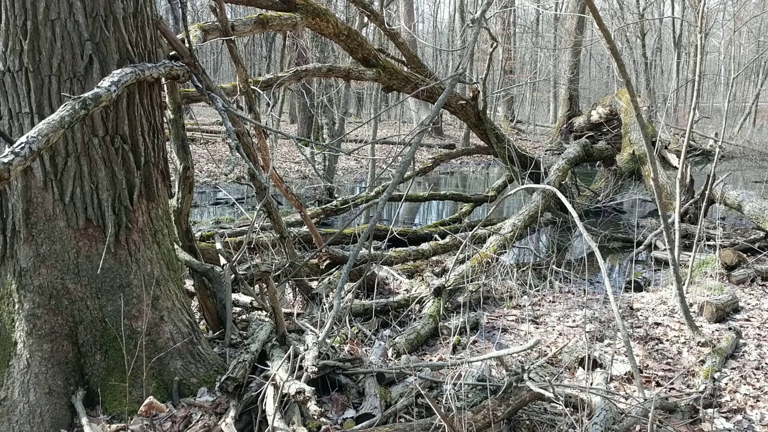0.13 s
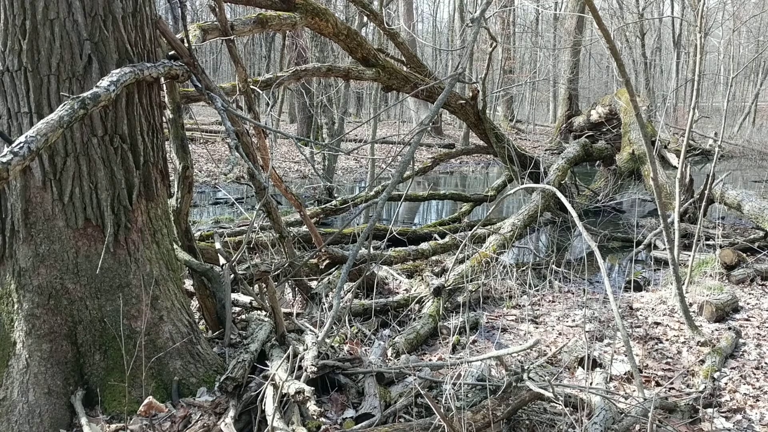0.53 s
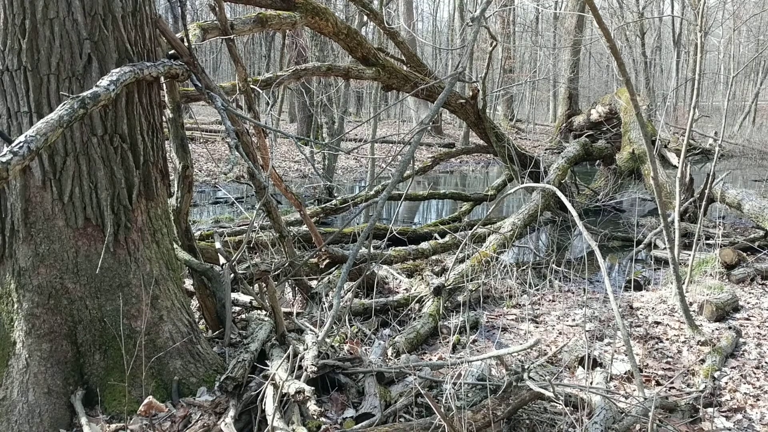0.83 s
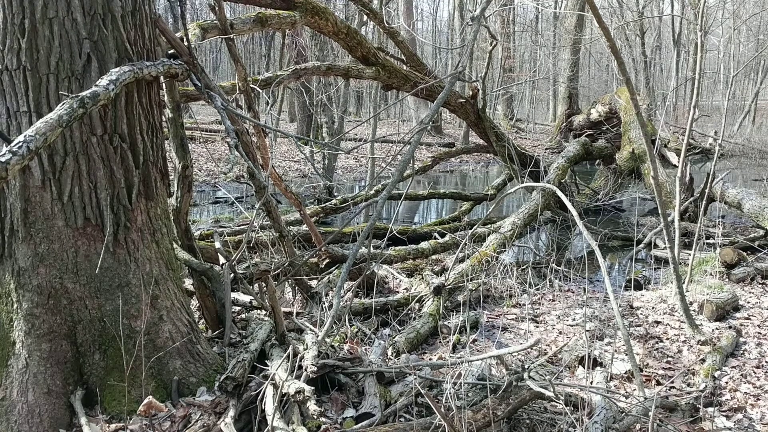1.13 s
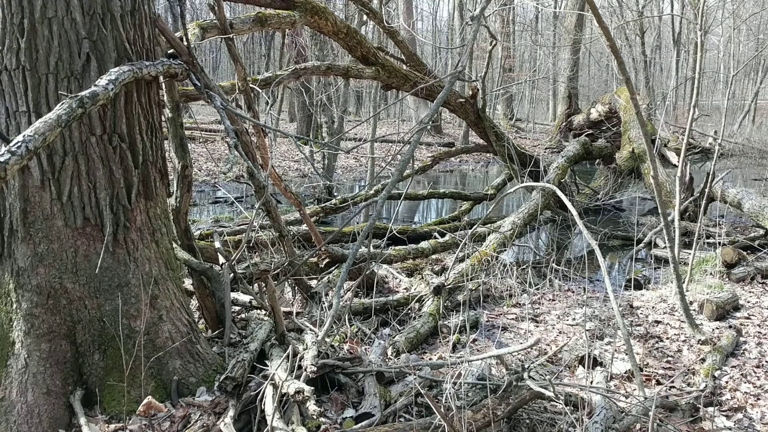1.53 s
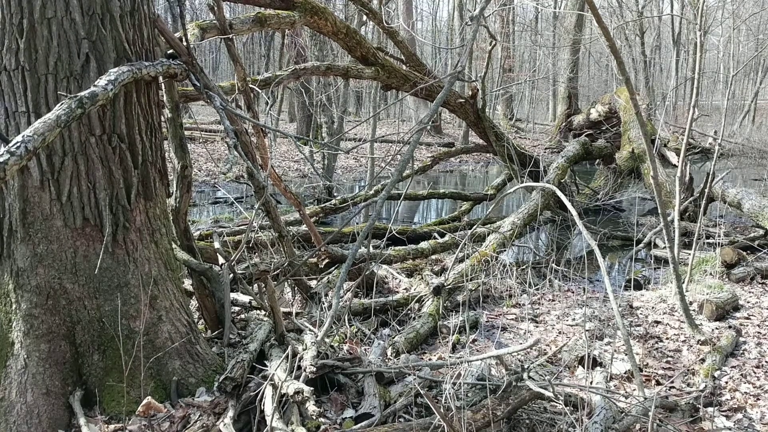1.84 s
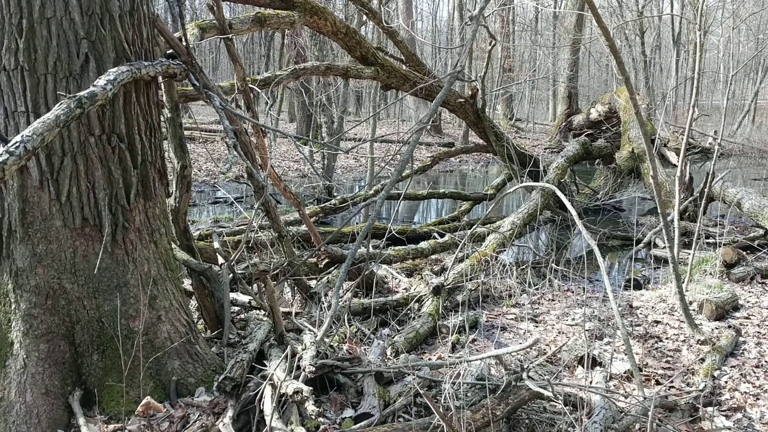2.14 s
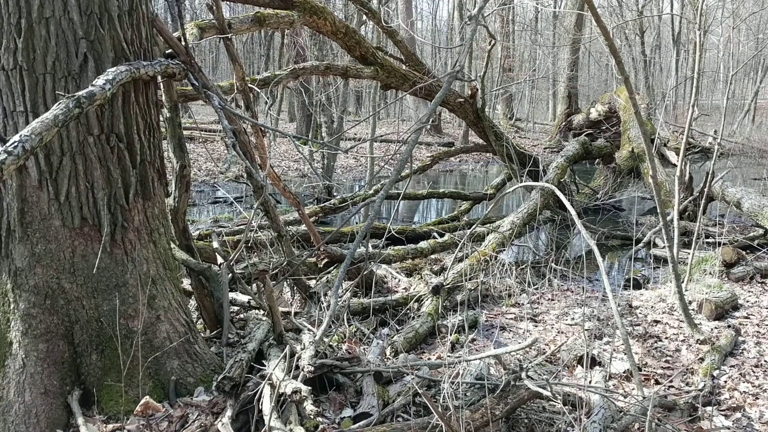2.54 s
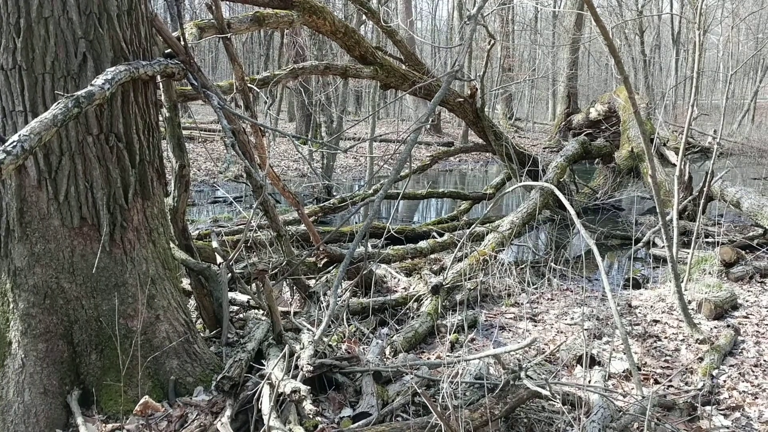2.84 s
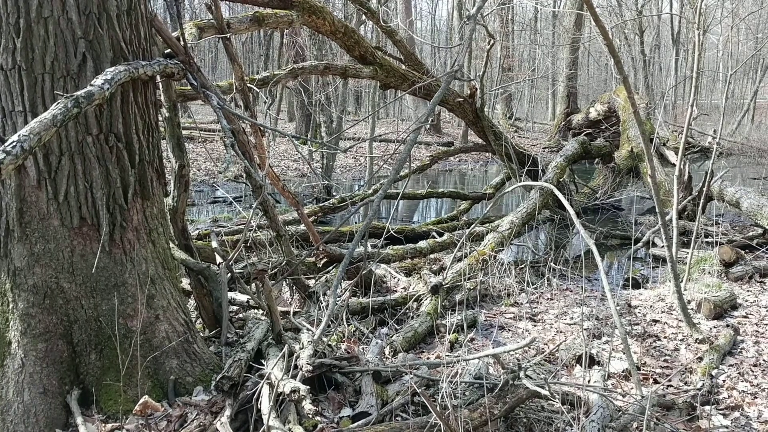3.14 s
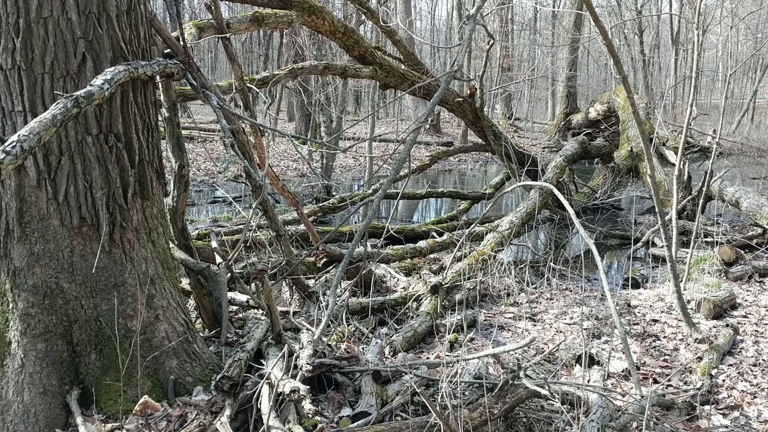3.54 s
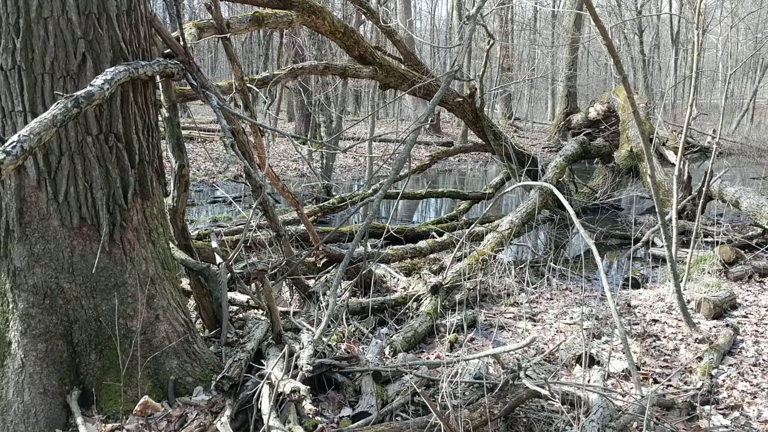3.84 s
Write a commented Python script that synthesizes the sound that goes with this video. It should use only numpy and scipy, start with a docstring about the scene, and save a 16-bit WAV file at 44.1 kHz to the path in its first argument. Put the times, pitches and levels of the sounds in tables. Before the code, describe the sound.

Many frogs give short, raspy, overlapping quacks near the microphone, with weaker ones far off, in an echoing woodland pond. Light wind rumbles, buffeting the microphone more in the second half; a few leaf ticks.

```python
"""Frogs quack near the microphone in a woodland pond. Each quack is a short train of pulses that speeds up
and slows again while it rings the vocal sacs, body and throat; trunks and water scatter it.
More frogs call weakly far off. Light wind, as filtered noise, rumbles and buffets the microphone;
dry leaves tick as short bright noise bursts over a smooth hiss. The sound fades in at the start."""
import sys
import numpy as np
from scipy import signal
from scipy.fft import rfft, irfft
from scipy.io import wavfile
from scipy.ndimage import uniform_filter1d

SR = 44100
rng = np.random.default_rng(int(sys.argv[2]) if len(sys.argv) > 2 else 0)


def master_out(mix):
    """Clip the mix to full scale and print it as 16-bit PCM to the path in sys.argv[1]."""
    frames = np.transpose(np.atleast_2d(mix))
    ceiling = np.clip(frames, -1, 1)
    pcm = np.round(ceiling * 32767).astype(np.int16)
    wavfile.write(sys.argv[1], SR, pcm)


N = 176400
SIZE = 8192  # samples in a quack or tick
RUMBLE_LOW_HZ = 48.3  # lower edge of wind and air


def undb(db):
    """Decibels to gain."""
    return 10 ** (np.asarray(db) / 20)


def level(x, db):
    """Scale to an rms level."""
    return x * undb(db) / np.sqrt(np.mean(x ** 2))


def burst(x, length_s, db):
    """Scale a short sound so its energy spread over length_s has this rms level."""
    return x * undb(db) * np.sqrt(length_s * SR / (np.sum(x ** 2) + 1e-18))


def add(out, start_s, x):
    """Mix x into out at a time, cropped to the scene."""
    i = int(start_s * SR)
    a, b = max(i, 0), min(i + len(x), N)
    if b > a:
        out[a:b] += x[a - i:b - i]


def freqs(size):
    """Frequencies of a spectrum's bins in Hz, kept above zero."""
    return np.maximum(np.arange(size // 2 + 1) * SR / size, 1e-3)


def ring(f, hz, width_hz):
    """Response of one resonance, gain 1 at its centre."""
    return 1 / (1 + 1j * (f * f - hz * hz) / (f * width_hz))


def noise(gain):
    """White noise shaped by a gain per frequency bin."""
    white = rng.standard_normal(2 * (len(gain) - 1))
    return irfft(rfft(white) * gain)


def interpolated(points):
    """Gain over the scene from (s, dB) points."""
    return undb(np.interp(np.arange(N) / SR, *np.array(points).T))


def pulse_train(length_s, rate_hz, rough, count=64):
    """Pulse times, places (-1 to 1) and strengths: the train swells, quickens and slows."""
    first_pulse_cycles, jitter_cycles, shimmer_db = 0.388, 0.2125, 4.5  # scatters at full roughness
    rate_sag = 0.11  # approximate share by which the pulse rate drops at the ends
    swell_power, swell_skew = 0.4, 0.73  # fullness; skew under 1 puts the peak early
    slip, strength = rng.standard_normal((2, count))
    cycles = np.arange(count) + first_pulse_cycles + jitter_cycles * rough * slip
    steady_s = cycles / rate_hz - length_s / 2
    when_s = steady_s * (1 + rate_sag * ((2 * steady_s / length_s) ** 2 - 1) / np.pi)
    live = np.abs(when_s) < length_s / 2
    place = 2 * when_s[live] / length_s
    swell = np.sin(np.pi * ((place + 1) / 2) ** swell_skew) ** swell_power
    return when_s[live] + length_s / 2, place, swell * undb(shimmer_db * rough * strength[live])


def body_response(f):
    """Lower resonances of the body, each with a broader skirt."""
    # Each row: centre in Hz, width in Hz, level in dB
    body_modes = [(659, 154, -8), (1166, 53, -7.5)]
    return sum(undb(db) * ring(f, hz, width) * ring(f, hz, hz / 2) for hz, width, db in body_modes)


def throat_response(f, sac_hz):
    """Upper throat resonances partly follow the sac pitch; a broad rasp adds each pulse's click."""
    # Each row: multiple of the base pitch, width in Hz, level in dB
    throat_modes = [(1.399, 280, -22), (1.78, 219, -22.5), (2.97, 260, -29.5)]
    follow, skirt_hz, typical_sac_hz = 0.67, 850, 1370
    rasp_db, rasp_hz = -46, 3330
    base_hz = typical_sac_hz * (sac_hz / typical_sac_hz) ** follow
    throat = undb(rasp_db) * ring(f, rasp_hz, rasp_hz) ** 4
    for multiple, width_hz, db in throat_modes:
        hz = multiple * base_hz
        throat = throat + undb(db) * ring(f, hz, width_hz) * ring(f, hz, skirt_hz) ** 2
    return throat


def quack(length_s, db, rate_hz, sac_hz, rough, bright_db):
    """Each pulse rings the sacs, whose pitch arches with the effort, plus the body and throat."""
    sac_sag = 0.1  # share by which the sac resonance drops at the ends
    sac_width_hz, sac_skirt_hz, voice_top_hz = 273, 1110, 4760
    t, f = np.arange(SIZE // 16) / SR, freqs(SIZE)
    pulses, sac = np.zeros(SIZE), np.zeros(SIZE)
    for time_s, place, push in zip(*pulse_train(length_s, rate_hz, rough)):
        i = time_s * SR
        k = int(i)
        pulses[k:k + 2] += push * np.array([1 - i + k, i - k])  # between-sample timing
        age_s = t + (k + 1 - i) / SR
        pitch_hz = sac_hz * (1 - sac_sag * place * place)
        decay = np.exp(-np.pi * sac_width_hz * age_s)
        sac[k + 1:k + 1 + len(age_s)] += push * decay * np.cos(2 * np.pi * pitch_hz * age_s)
    sac_spectrum = rfft(sac) * 2 * np.pi * sac_width_hz / SR * ring(f, sac_hz, sac_skirt_hz) ** 2
    upper = undb(bright_db) * throat_response(f, sac_hz)
    voice = irfft(sac_spectrum + rfft(pulses) * (body_response(f) + upper))
    lowpass = signal.butter(6, voice_top_hz, fs=SR, output="sos")
    return burst(signal.sosfilt(lowpass, voice), length_s, db)


def near_frogs():
    """Each near quack has its own scatter from trunks and water, stronger for the rough ones."""
    # Each row: middle in seconds, nominal length in seconds, level in dB, nominal pulse rate in Hz,
    # sac resonance in Hz, roughness 0-1, brightness in dB
    quacks = [ (0.18, .04, -51.5, 283, 1740, 0.67, 4), (0.223, 0.042, -49, 289.7, 1770, 0.8, 4.5),
              (0.274, .025, -60, 325, 2310, .3, -9), (0.245, 0.039, -44, 454.7, 1376, 0.31, 4),
              (0.323, 0.052, -47.5, 358.6, 1330, .3, 8.5), (0.355, 0.029, -38, 357.7, 1470, 0.28, 6),
              (0.381, 0.024, -39, 375.2, 1510, 0.13, -23), (0.429, 0.044, -50, 221, 1540, 0.47, 3),
              (.488, 0.025, -49, 359.7, 1390, 0.13, -7), (.517, 0.033, -47, 317.7, 1210, 0.39, -8),
              (0.578, .06, -46, 370.4, 1420, 0.42, -2), (0.634, 0.064, -46.5, 383, 1363, 0.4, 2),
              (0.755, 0.045, -46.5, 217.4, 1180, 0.32, 4), (.836, 0.043, -47.5, 302, 1530, 0.57, -5),
              (0.88, 0.051, -48, 180, 1170, 0.68, -3), (0.95, 0.049, -49, 195, 1430, 0.54, 0),
              (0.98, 0.039, -44.5, 276.7, 1330, 0.75, 0), (1.015, 0.039, -49, 251, 1380, 0.41, -6),
              (1.071, 0.036, -47.5, 311, 1300, 0.65, -10), (1.093, 0.048, -49, 315, 1320, 0.62, -5),
              (1.147, 0.044, -43, 229.4, 1360, 0.44, 1), (1.197, 0.08, -47, 169, 1410, 0.57, 0),
              (1.383, 0.021, -47.5, 218, 1370, 0.32, -15), (1.446, 0.043, -49, 230, 1470, 0.61, 7),
              (1.461, 0.032, -42.5, 428, 1370, 0.08, 6), (1.494, 0.0087, -41.5, 402, 1770, 0.21, 2),
              (1.505, 0.024, -41, 209.3, 1555, 0.2, 3.5), (1.599, 0.036, -47, 288, 1070, 0.42, -12),
              (1.614, 0.039, -55, 333, 2150, 0.42, 4), (1.645, 0.045, -43.5, 314.6, 1340, 0.54, 3.5),
              (1.724, 0.033, -44, 346.4, 1300, 0.37, -0.5), (1.766, 0.055, -45.5, 288.4, 1410, 0.63, -5),
              (1.817, 0.043, -46, 346, 1420, .2, -2), (1.881, 0.045, -51, 333, 1440, 0.06, 2),
              (1.914, 0.054, -48, 296.6, 1320, 0.48, -7), (1.978, 0.016, -42, 321, 1480, 0.54, -3),
              (2.006, 0.038, -46.5, 204.2, 1320, 0.5, -1), (2.075, 0.04, -54, 213.6, 1350, 0.38, -13),
              (2.142, 0.043, -49.5, 239.5, 1290, 0.56, 1), (2.177, 0.045, -44, 294, 1290, 0.51, 0),
              (2.217, 0.05, -45, 332.2, 1385, 0.25, 2), (2.281, 0.045, -43, 318.6, 1370, 0.58, 1.5),
              (2.329, 0.031, -37.5, 432, 1690, 0.34, -15), (2.392, 0.078, -45.5, 239, 1290, 0.44, -20),
              (2.428, 0.023, -42, 392, 1570, 0.16, -5), (2.458, 0.035, -46, 380.6, 1445, 0.38, 4.5),
              (2.46, 0.048, -51, 387, 1970, 0.37, -12), (2.497, 0.053, -49.5, 216.2, 1310, 0.68, -2),
              (2.6, 0.028, -40.5, 292.5, 1347, 0.48, -4.5), (2.684, 0.039, -43, 298.6, 1585, 0.58, 6.5),
              (2.717, 0.04, -39.5, 354, 1335, 0, 2.5), (2.747, 0.027, -47, 311.6, 1540, 0.28, -4),
              (2.842, 0.055, -53.5, 317.6, 1195, 0.13, 4), (2.909, 0.041, -52.5, 273.5, 1350, 0.47, -7),
              (2.954, 0.032, -54, 271.7, 1830, 0.33, -6), (2.994, 0.037, -47, 325.6, 1430, 0.31, -13),
              (3.052, 0.058, -48, 276.7, 1410, 0.46, 0), (3.12, 0.063, -46, 348.5, 1480, 0.47, 3),
              (3.145, 0.054, -42, 352.6, 1355, 0.24, -7), (3.207, .02, -43, 328, 1430, .3, 1),
              (3.234, 0.072, -48.5, 107.2, 1430, 0.38, -6), (3.288, .036, -46.5, 339, 1400, 0.43, 5.5),
              (3.313, .024, -37.5, 368.4, 1500, .2, -7), (3.358, 0.061, -43, 230, 1440, 0.65, -3.5),
              (3.384, 0.02, -45.5, 278, 1410, 0.6, 0.5), (3.436, 0.048, -47.5, 249.2, 1460, 0.64, -8),
              (3.538, 0.036, -44, 329.4, 1580, 0.5, -10), (3.561, 0.04, -48.5, 307, 1300, 0.2, -6),
              (3.614, 0.039, -49.5, 198.8, 1440, 0.51, 5.5), (3.706, 0.036, -46, 243, 1330, 0.39, -5),
              (3.756, .03, -52, 279, 1340, 0, 0), (3.788, .022, -46.5, 278, 1310, 0.54, 5.5),
              (3.811, 0.025, -39, 338, 1425, 0.31, -3), (3.841, .03, -41, 264, 1410, 0.44, -3),
              (3.862, 0.022, -38.5, 355.7, 1440, 0.35, -0.5), (3.915, 0.033, -39.5, 167.2, 1460, 0.18, 2.5),
              (3.951, .044, -41, 112.1, 1280, 0.26, -20), (3.991, 0.043, -47.5, 289.5, 1770, 0.61, 7)]
    scatter_t60_s, scatter_db = 0.046, 5.5  # gain at full roughness
    out = np.zeros(N)
    for middle_s, length_s, db, rate_hz, sac_hz, rough, bright_db in quacks:
        length_s, rough = np.clip(length_s, .01, .12), np.clip(rough, 0, 1)
        call = quack(length_s, db, rate_hz, sac_hz, rough, bright_db)
        scatter = rng.standard_normal(SIZE) * undb(-60 * np.arange(SIZE) / SR / scatter_t60_s)
        scatter = scatter / np.linalg.norm(scatter)
        call = call + rough * undb(scatter_db) * signal.fftconvolve(call, scatter)[:SIZE]
        add(out, middle_s - length_s / 2, burst(call, length_s, db))
    return out


def far_frogs():
    """Weak, dull quacks with random pitch and level, jittered about even spacing."""
    count, mean_db, spread_db, bright_db = 160, -59, 4.5, -22
    out = np.zeros(N)
    for k, (when, loud, pitch, sac) in enumerate(rng.standard_normal((count, 4))):
        rate_hz, sac_hz = 310 * np.exp(.18 * pitch), 1350 * np.exp(0.075 * sac)
        call = quack(.05, mean_db + spread_db * loud, rate_hz, sac_hz, .5, bright_db)
        add(out, (k + when / 2) / count * N / SR, call)
    return out


def woods_echoes(frogs):
    """Trunks and water return a decaying cloud of reflections, duller than the calls."""
    t60_s, gain_db, top_hz = 0.76, -11.5, 3630
    t = np.arange(SR) / SR
    cloud = noise(1 / np.hypot(1, freqs(SR) / top_hz))
    tail = level(cloud, 0) * undb(-60 * t / t60_s) * (1 - np.exp(-t / .003))
    band = np.abs(rfft(tail))[700:2200]  # bins are 1 Hz apart
    tail = tail / np.sqrt(np.mean(band ** 2))  # unit rms gain in the voice band
    return undb(gain_db) * signal.fftconvolve(frogs, tail)[:N]


def turbulence(size, top_hz, slope):
    """Low pressure noise of air tumbling over the microphone."""
    f = freqs(size)
    return noise(1 / np.hypot(1, (RUMBLE_LOW_HZ / f) ** 7) / np.hypot(1, (f / top_hz) ** slope))


def wind():
    """A soft rumble with short buffets, each one smooth swell of turbulence."""
    # Each row: time in seconds, rumble level in dB
    rumble_levels = [(0, -71), (.4, -58.5), (.6, -52.5), (1.3, -51.5), (2.1, -50.5), (2.8, -47),
                     (3.4, -47.5), (3.6, -51), (4, -52.5)]
    # Each row: middle in seconds, length in seconds, level in dB, upper edge in Hz
    buffets = [(0.558, 0.059, -48.5, 60), (.8, 0.31, -55, 89), (1.048, 0.036, -47, 65),
               (1.441, 0.078, -40, 103), (1.59, 0.093, -45.5, 88), (2.238, 0.097, -45.5, 89),
               (2.362, 0.084, -56, 72), (2.471, 0.033, -35.5, 110), (2.606, 0.021, -36.5, 71),
               (2.657, 0.048, -31.5, 117.4), (2.833, 0.028, -37, 64.8), (2.867, 0.0073, -26.5, 247),
               (2.876, 0.033, -27, 106), (3.026, 0.044, -29.5, 92.4), (3.173, 0.073, -30.5, 60),
               (3.212, 0.1, -41, 100), (3.274, 0.021, -35, 80), (3.334, 0.037, -27, 106),
               (3.375, 0.07, -37, 58.5)]
    rumble_top_hz, rumble_slope = 80.5, 2.725
    buffet_slope, steady_s = 3.32, 0.021
    out = level(turbulence(N, rumble_top_hz, rumble_slope), 0) * interpolated(rumble_levels)
    t = (np.arange(SIZE * 2) - SIZE) / SR
    for middle_s, length_s, db, top_hz in buffets:
        eddy = turbulence(SIZE * 2, top_hz, buffet_slope)
        power = np.abs(signal.hilbert(eddy)) ** 2
        eddy = eddy / np.sqrt(uniform_filter1d(power, int(steady_s * SR)))  # even out its level
        swell = np.exp(-np.abs(2 * t / length_s) ** 1.4)
        add(out, middle_s + t[0], burst(eddy * swell, length_s, db))
    return out


def leaves():
    """Tiny bright ticks of dry leaves: resonant noise with a fast rise and decay."""
    # Each row: start in seconds, level in dB, centre in Hz
    ticks = [(1.565, -77, 11800), (1.716, -72, 11800), (2.486, -69, 14100), (2.5, -74, 14000),
             (2.822, -69, 12800), (2.833, -65.5, 11900), (3.08, -75, 12000)]
    decay_s, rise_s, width_hz = 0.0036, 0.0027, 3800
    out, t = np.zeros(N), np.arange(SIZE) / SR
    shape = np.exp(-t / decay_s) * (1 - np.exp(-t / rise_s))
    for start_s, db, hz in ticks:
        tick = noise(ring(freqs(SIZE), hz, width_hz)) * shape
        add(out, start_s, burst(tick, decay_s, db))
    return out


def air():
    """Smooth distant hiss of the woods: shaped noise, swelling gently."""
    # Each row: frequency in Hz, relative spectral density in dB
    spectrum = [(100, -1), (300, 6.5), (480, -4.5), (700, -1), (1500, -5), (3000, -19.5), (5000, -23.5),
                (7000, -26.5), (9000, -33), (15500, -36)]
    # Each row: time in seconds, gain in dB
    swell_points = [(0, -11.5), (.4, 2), (1.0, .5), (1.6, -0.5), (2.2, 2), (2.6, 0), (3.4, 0.5), (4, 1.5)]
    db_before_swell = -57
    f = freqs(N)
    hz, db = np.array(spectrum).T
    gain = undb(np.interp(np.log(f), np.log(hz), db)) / np.hypot(1, (RUMBLE_LOW_HZ / f) ** 4)
    return interpolated(swell_points) * level(noise(gain), db_before_swell)


def scene():
    """The chorus among the trees, with wind, leaves and air."""
    frogs = near_frogs() + far_frogs()
    return (frogs + woods_echoes(frogs) + wind() + leaves() + air())[None]


def record(dry):
    """Fade in, then cut the top with a steep lowpass."""
    fade_start_s, fade_s, fade_power, top_hz = 0.13, 0.2, 0.57, 15700
    fade = np.clip((np.arange(N) / SR - fade_start_s) / fade_s, 0, 1) ** fade_power
    lowpass = signal.ellip(10, .2, 70, top_hz, fs=SR, output="sos")
    return signal.sosfilt(lowpass, dry * fade)


dry = scene()
out = record(dry)
master_out(out)
```